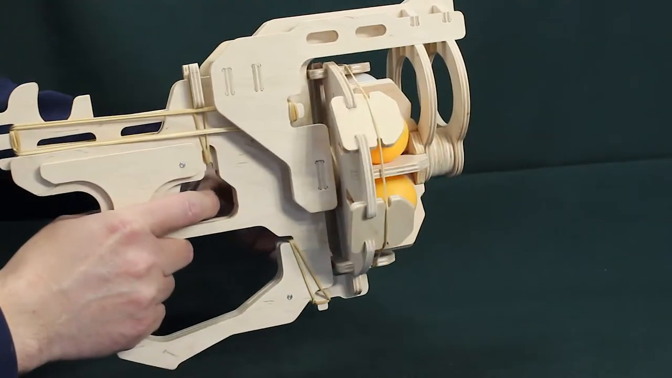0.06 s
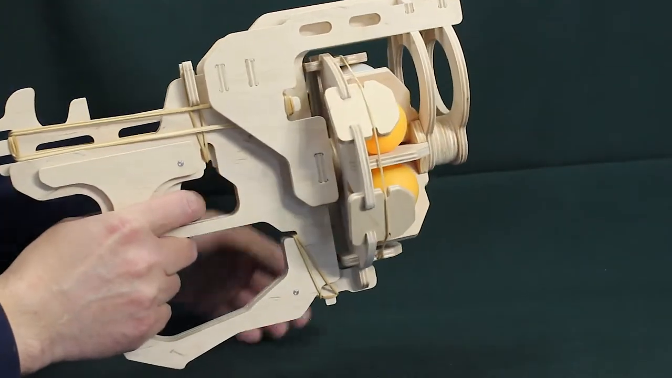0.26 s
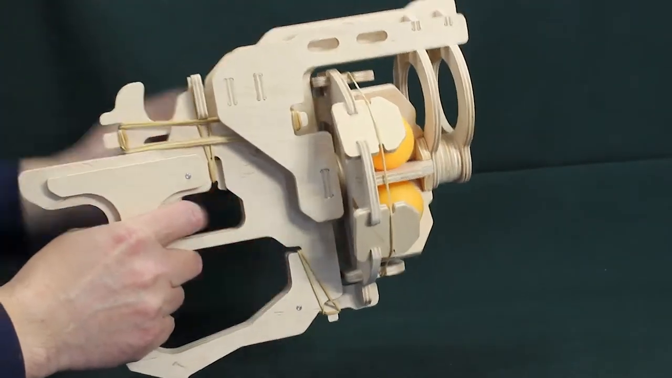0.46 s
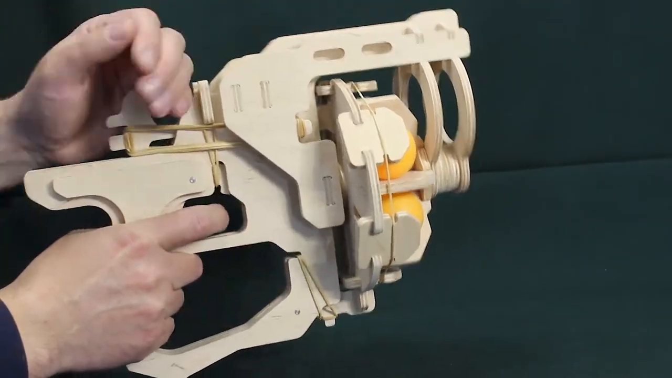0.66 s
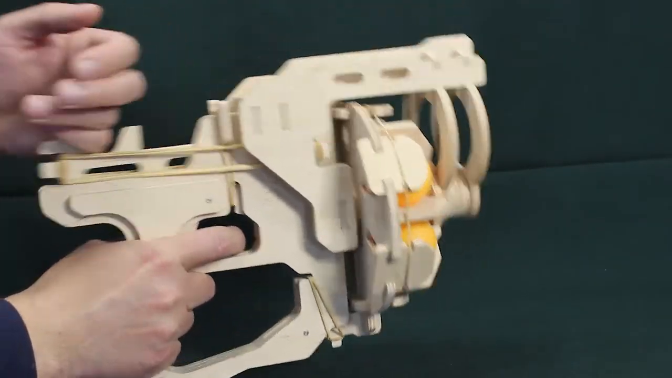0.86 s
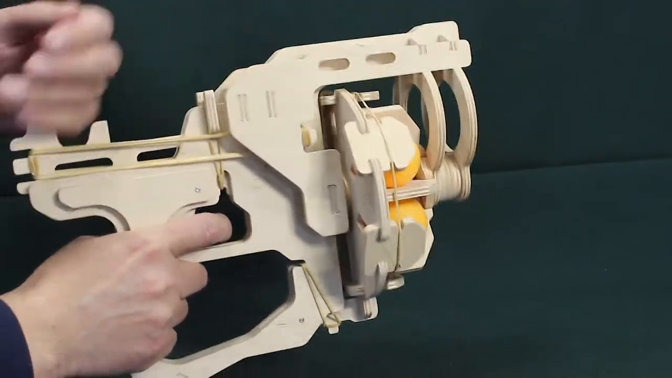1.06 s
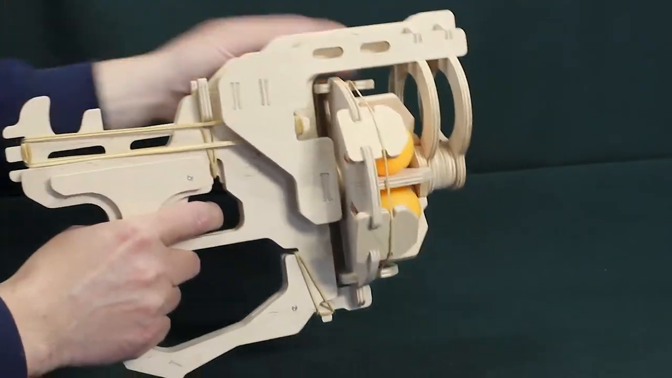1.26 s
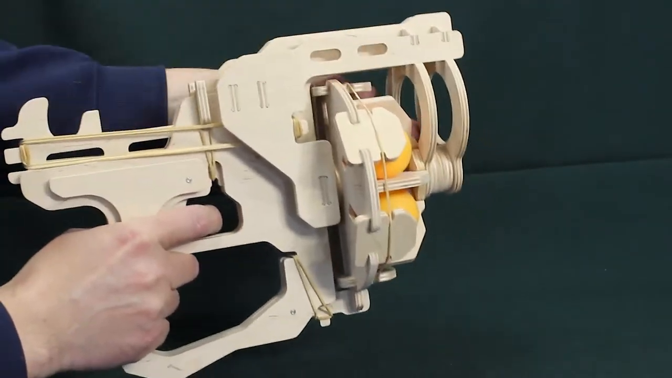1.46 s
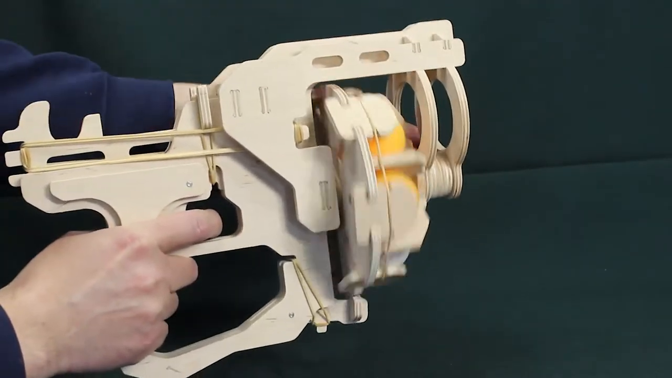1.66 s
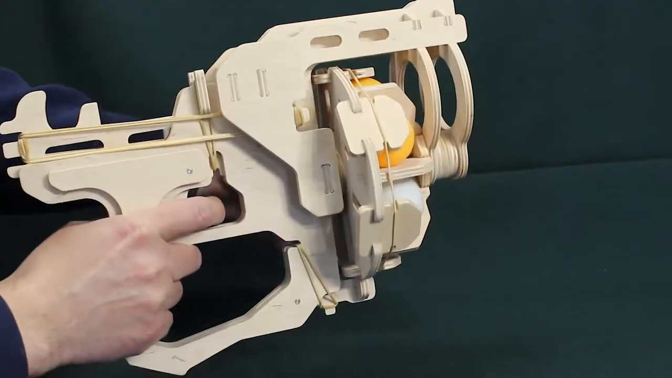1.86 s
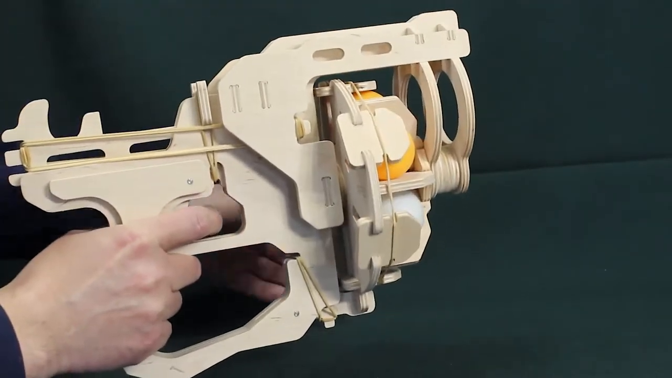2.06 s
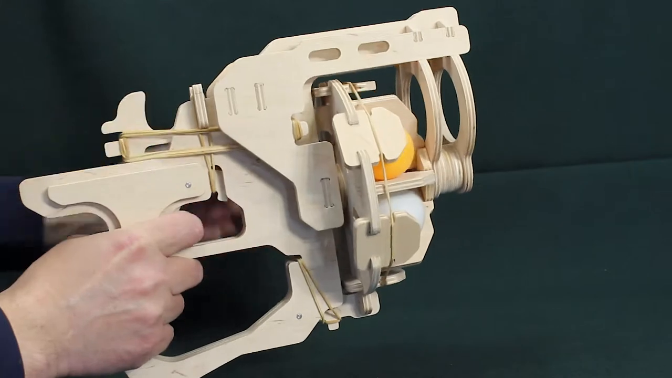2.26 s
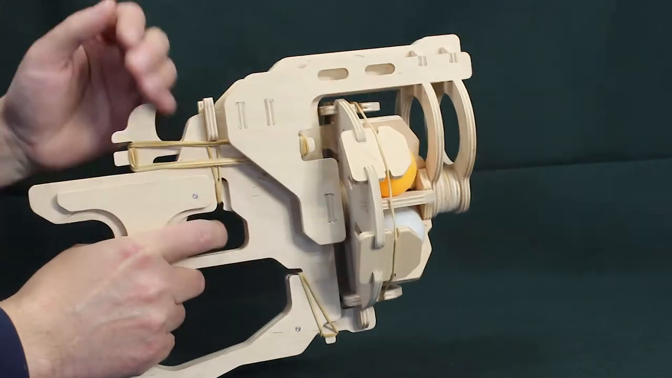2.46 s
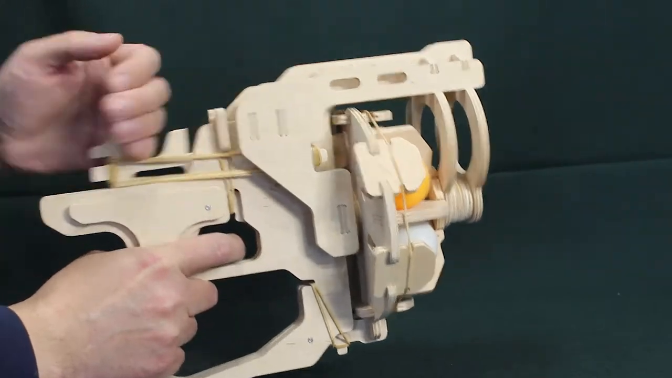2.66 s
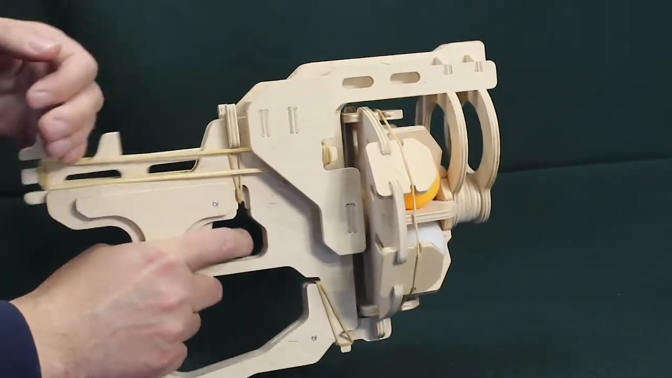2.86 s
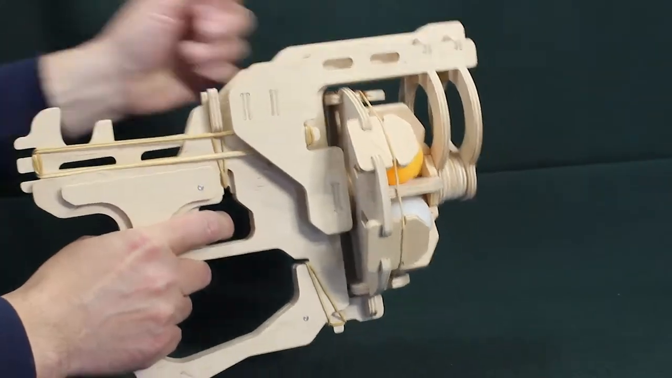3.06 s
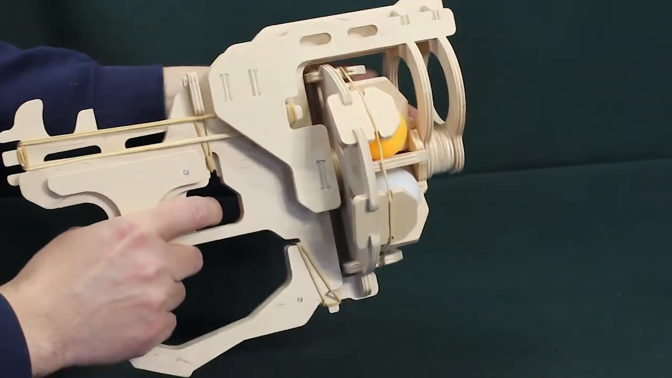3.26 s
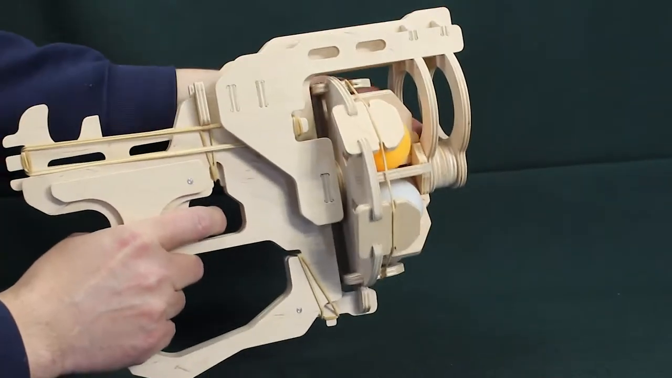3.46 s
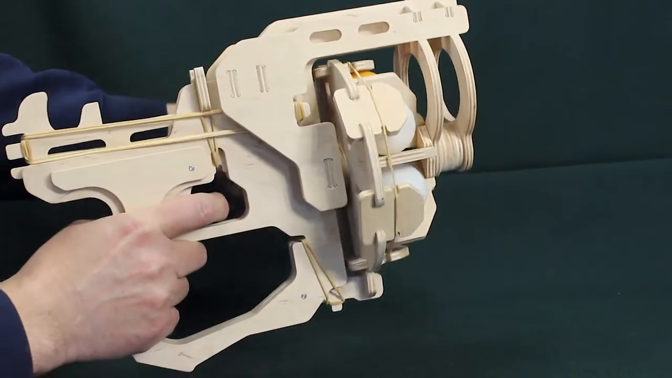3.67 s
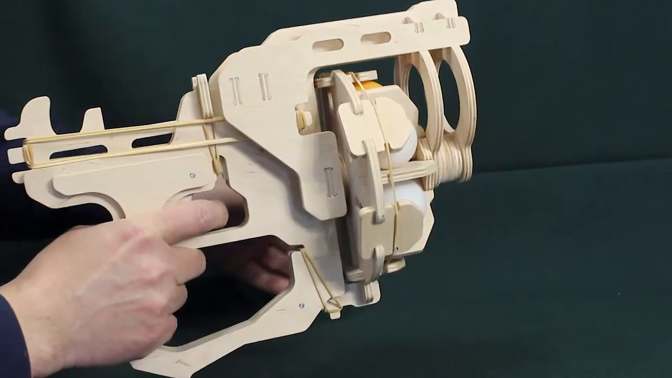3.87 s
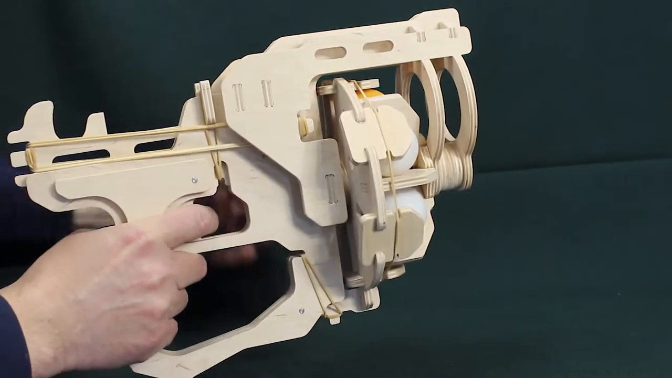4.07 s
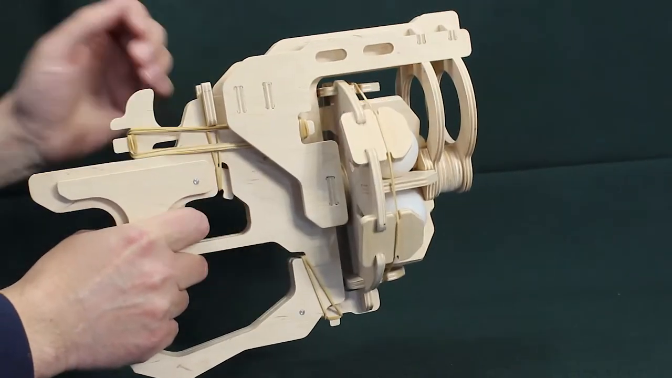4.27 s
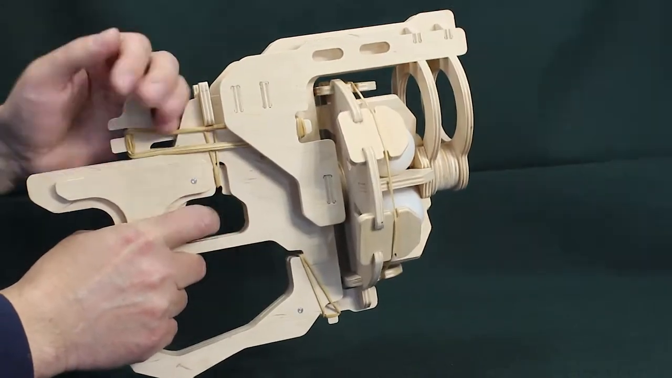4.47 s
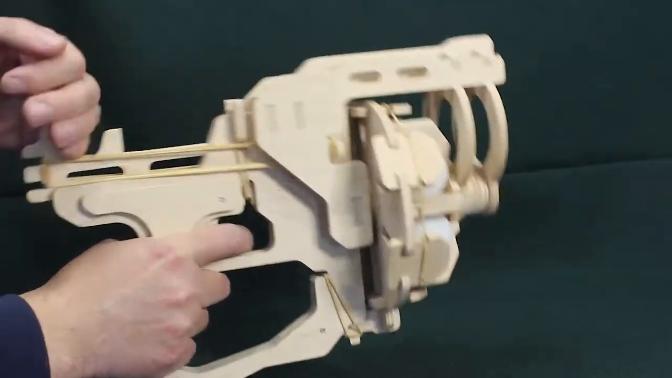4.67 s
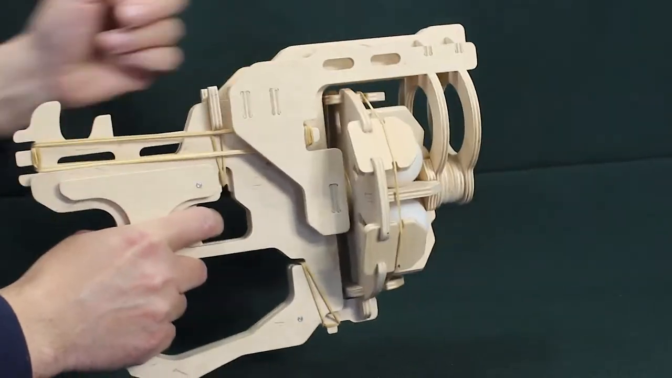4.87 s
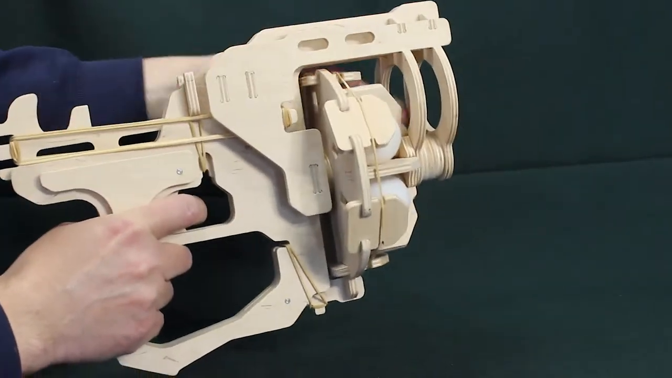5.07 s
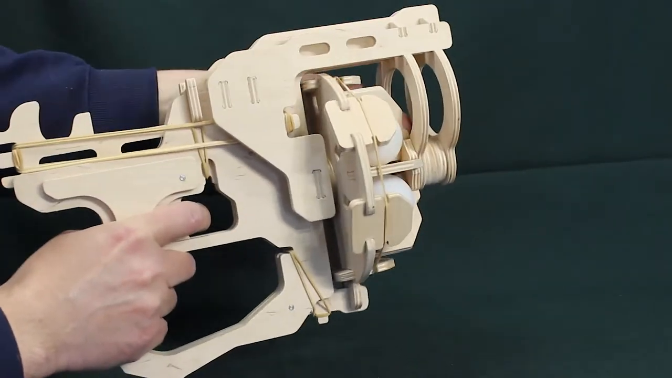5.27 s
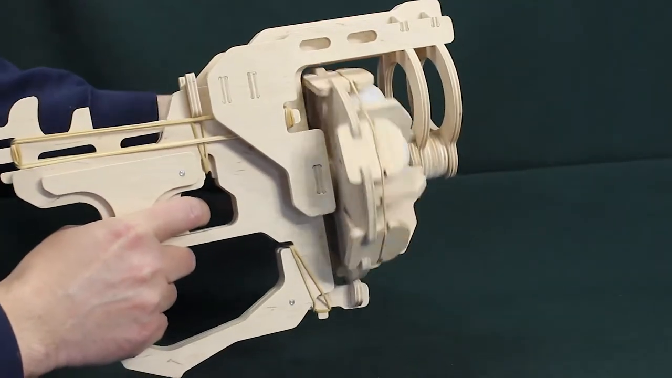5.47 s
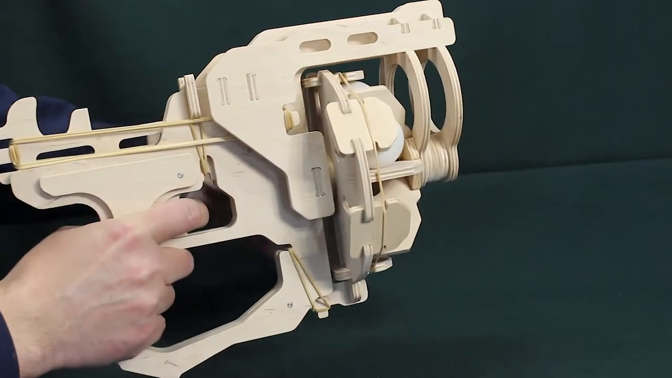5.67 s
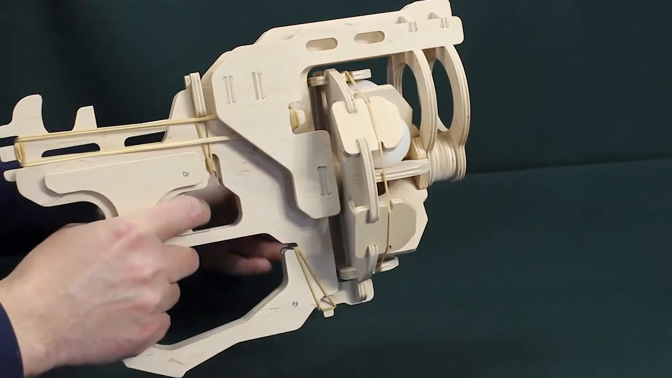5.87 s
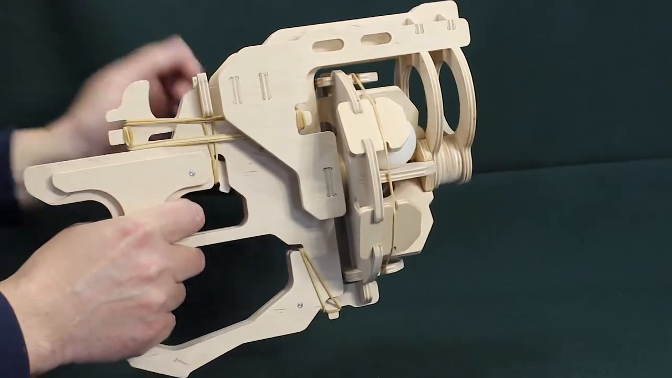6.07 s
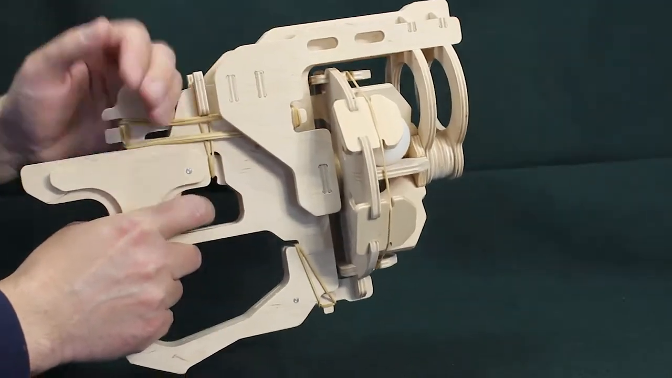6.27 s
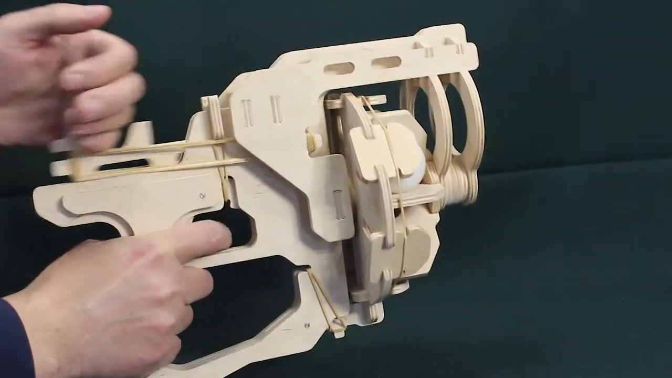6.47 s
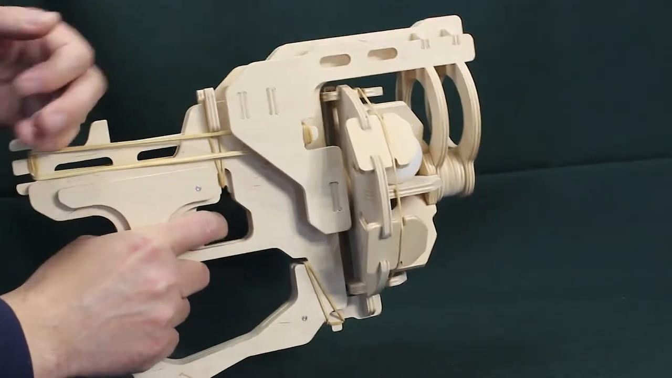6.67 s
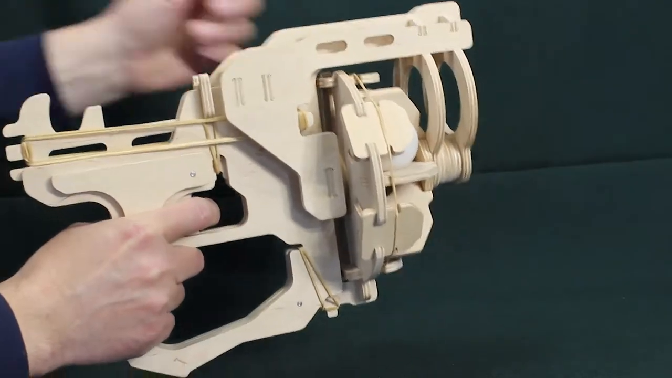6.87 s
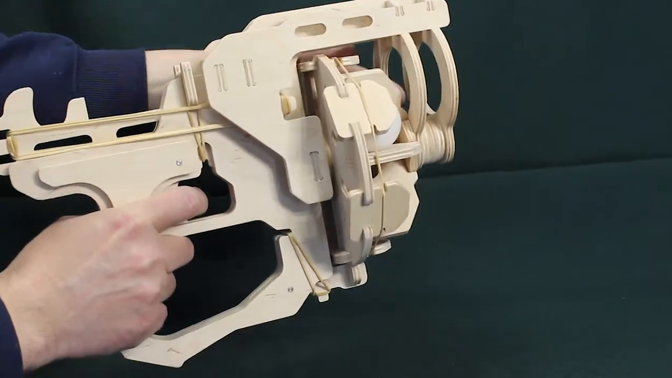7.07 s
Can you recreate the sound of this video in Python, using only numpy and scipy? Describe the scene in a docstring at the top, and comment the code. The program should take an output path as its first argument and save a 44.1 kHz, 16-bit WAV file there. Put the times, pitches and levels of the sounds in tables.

```python
"""Rubber-band gun firing table-tennis balls

A plywood gun fires four balls close to the microphone in a fairly live room. Slider slams are noise cracks
plus decaying frame modes; latch, drum and faint ticks are softer versions with one ringing part.
Balls thud into cloth (filtered pushes) and bounce on a hard floor (half-sine contacts plus shell modes).
A hollow thing is knocked, a ball squeaks, an arm stirs the air; noise impulse responses give the echo."""
import sys
import numpy as np
from scipy import signal
from scipy.fft import rfft, irfft, next_fast_len
from scipy.io import wavfile
from scipy.ndimage import uniform_filter1d

SR = 44100
rng = np.random.default_rng(int(sys.argv[2]) if len(sys.argv) > 2 else 0)


def transcribe(u):
    """Save the signal u as a 16-bit wav file named by the first command-line argument.

    u: samples, shape (n,) or (channels, n), limited to [-1, 1]; the rate is SR.
    q: integer samples, one column per channel.
    """
    v = np.clip(np.atleast_2d(u).T, -1, 1)
    q = np.round(v * 32767).astype(np.int16)
    wavfile.write(sys.argv[1], SR, q)


N = 313992

# Room tone spectrum. Each row: frequency in Hz, level in dB.
ROOM_TONE_SPECTRUM = [(20, -9), (70, -15.5), (200, -7.5), (700, -14.5), (1700, -15.5), (3000, -18.5),
                      (6000, -20.5), (16000, -22.5)]
# Spectrum of the air buffeting the microphone. Each row: frequency in Hz, level in dB.
BUFFET_SPECTRUM = [(15, 1), (35, -3.5), (60, -10), (130, -11.5), (250, -14.5), (800, -29), (4000, -81)]
# Spectrum of the sleeve's rustle. Each row: frequency in Hz, level in dB.
SLEEVE_SPECTRUM = [(100, -20.5), (400, 1.5), (1500, -0.5), (4000, -4), (7000, -14), (16000, -27.5)]
# Spectrum of the room's echo. Each row: frequency in Hz, level in dB.
ECHO_SPECTRUM = [(40, -18.5), (150, 2.5), (300, 2.5), (500, 1), (1500, 0.5), (3500, -2.5), (6000, -3),
                 (10000, -4), (16000, -5.5)]
# Decay of the room's tail. Each row: frequency in Hz, t60 in seconds.
ROOM_T60 = [(100, 0.37), (500, 0.65), (2000, 0.5), (4000, 0.46), (8000, 0.36), (16000, 0.3)]
# Squeak of a spinning ball. One row: start in seconds, length in seconds, initial pitch in Hz, peak in dB.
SQUEAK = (1.545, .125, 3770, -59)
# Knocks on something hollow, perhaps by a stray ball. Each row: start in seconds, level in dB,
# lowest mode that the blow reaches in Hz, t60 of the chatter in seconds.
HOLLOW_KNOCKS = [(1.020, -50.5, 270, 0.66), (1.185, -47, 195, 0.77), (1.522, -47, 370, 0.51),
                 (1.855, -50.5, 378, 0.25)]
# Modes of the hollow thing. Each row: frequency in Hz, level in dB, t60 in seconds.
HOLLOW_MODES = [(191.6, -0.5, 0.43), (280, 0, .65), (370, -4.5, 0.63), (460, 0, 0.4), (535, -3.5, .4),
                (657, -0.5, 0.15), (862, -3.5, 0.27), (960, 0.5, 0.32), (1090, -2.5, 0.25),
                (1195, -8, 0.15), (1486, 0.5, 0.16)]
# Soft blows, mostly balls caught by the cloth after a shot. Each row: start in seconds, pat level in dB,
# pat pitch in Hz, flap level in dB.
THUDS = [(.505, -32.5, 460, -36.5), (1.858, -41, 450, -51.5), (2.366, -38, 450, -37),
         (2.918, -48, 370, -67), (4.315, -31, 435, -37.5), (4.574, -47, 754, -54), (6.161, -34, 419, -38.5)]
# Spectrum of the cloth's flap. Each row: frequency in Hz, level in dB.
FLAP_SPECTRUM = [(50, -45), (110, -11), (155, 0), (230, -7), (350, -3.5), (800, -13), (3000, -45)]
# Floor bounces. Each row: start in seconds, knock level at 1 m in dB, distance in metres.
BOUNCES = [(0.3956, -42.5, 1.3), (0.5077, -27, .5), (0.787, -45.5, 0.83), (1.0264, -38, 2.8),
           (1.103, -40, 3.2), (1.18, -45.5, 5), (1.424, -46, 0.66), (1.5206, -34, 1.9), (1.6842, -49, 0.67),
           (2.0936, -48, 0.81), (2.4932, -49, 1.6), (3.5867, -37.5, 1.8), (4.026, -48, 0.97),
           (4.352, -41.5, 0.53), (4.9105, -29, 2), (5.389, -34.5, 1.1), (5.8073, -35.5, 1.17),
           (5.8626, -29, 0.5), (6.4943, -37, 1.45), (6.5701, -31.5, 0.42), (6.7002, -32, 1.54),
           (6.773, -33.5, 1.5), (7.0196, -40, 1.24)]
# Spectrum of the bounce's knock. Each row: frequency in Hz, level in dB.
BOUNCE_SPECTRUM = [(60, -50), (200, -24), (500, -16.5), (1200, -7.5), (2200, 3.5), (3500, 9.0), (8000, 0.0)]
# Modes of the ball's shell. Each row: mean frequency in Hz, mean level in dB.
SHELL_MODES = [(5800, -9.5), (8400, 2.5), (10900, 1.5), (13300, 1), (15300, -0.5)]
# Radiation of the small shell. Each row: frequency in Hz, level in dB.
SHELL_RADIATION = [(1000, -35), (5500, -0.5)]
# Cocking. Each row: latch catch in seconds, catch level in dB, slider settling in seconds, settling level
# in dB; levels precede the small-part filter.
COCKINGS = [(.9915, -21, 1.1318, -25), (2.8317, -21, 2.9657, -30.5), (4.7126, -19.5, 4.8265, -30),
            (6.6101, -20, 6.7357, -31)]
# Drum steps to the next ball. Each row: start in seconds, level before the small-part filter in dB,
# mean pitch of the ringing part in Hz.
DRUM_TURNS = [(1.897, -29.5, 3655), (3.7178, -28.5, 4355), (5.6215, -31.5, 1680)]
# Faint ticks: trigger, drum rocking back, rattling balls. Each row: start in seconds, level before the
# small-part filter in dB.
TICKS = [(0.1093, -43), (0.3529, -60), (2.5961, -45), (2.6856, -46.5), (2.7626, -50), (4.1928, -57)]
# Radiation of small parts, weak in the bass. Each row: frequency in Hz, level in dB.
SMALL_PART_RADIATION = [(200, -7.5), (700, -6), (1400, 0)]
# Spectrum of the frame's dense short modes. Each row: frequency in Hz, level in dB.
CRACK_SPECTRUM = [(30, -43.5), (200, -35), (500, -20), (800, -14.5), (1500, -7), (1950, 1.5), (2450, -2),
                  (2950, 0.5), (4300, 3), (5300, -4), (8200, -2), (9200, -7.5), (12000, -9), (16000, -17.5)]
# Modes of the plywood frame. Each row: mean frequency in Hz, width in Hz, mean level in dB.
FRAME_MODES = [(1288, 91, -17.5), (2033, 40, -4), (2170, 91, -5.5), (2840, 30, -5), (2920, 64, 2),
               (3630, 80, -1), (4020, 75, -4), (4504, 40, -5), (4780, 110, -5.5), (6490, 26, -8),
               (8060, 78, -5), (8326, 42, -4), (8990, 30, -6), (9850, 53, -11), (10600, 60, -17),
               (11670, 100, -7.5)]
# Slider hitting its stop. Each row: start in seconds, base level in dB, base brightness in dB per octave,
# slap on the ball in dB re the base level; each impact of the shot adds its own offsets.
SHOTS = [(0.4345, -9.5, 0.5, -13), (2.3013, -10, 0.36, -13.5), (4.2544, -8.5, 0.27, -8),
         (6.098, -8.5, 0.42, -16)]

LOWPASS_HZ = 16050
DRAUGHT_START_S, DRAUGHT_DB = 4.92, -57
DRAUGHT_RISE_S, DRAUGHT_HOLD_S, DRAUGHT_T60_S = 0.054, 0.1, 1.31
PULL_S, PULL_DB = .145, -65.5
TWIN_SPLIT_HZ, TWIN_DB = 26, -5.5
# contact length at the reference level, and the rise in level that halves it
CONTACT_MS, CONTACT_REF_DB, CONTACT_HALVING_DB = .44, -38, 20.5
SHELL_RE_KNOCK_DB, SHELL_T60_S, SHELL_SCATTER_DB = -1.5, 0.0022, 2.5
LATCH_HZ, LATCH_TILT_DB_PER_OCT = 3843, -2.06
SETTLE_HZ, SETTLE_TILT_DB_PER_OCT = 1367, -4.5
DRUM_TILT_DB_PER_OCT, ROCK_BACK_DB, ROCK_BACK_S = -5.5, -14, .0705
TICK_HZ, TICK_TILT_DB_PER_OCT = 2113, -8


def undb(db):
    """Decibels to gain."""
    return 10 ** (np.asarray(db) / 20)


def seconds(length_s):
    """Time axis in seconds."""
    return np.arange(int(length_s * SR)) / SR


def fade(t, t60_s):
    """Free exponential decay, 60 dB in t60."""
    return np.exp(-np.log(1000) * t / t60_s)


def unit(x):
    """Scale to rms 1."""
    return x / np.sqrt(np.mean(x ** 2))


def blow(x, db):
    """Give a hit the energy of one millisecond at this rms level."""
    return x * undb(db) / np.sqrt(np.sum(x ** 2) / (SR / 1000))


def read(points, hz):
    """Interpolate (Hz, value) points on a log-frequency axis."""
    point_hz, value = np.transpose(points)
    return np.interp(np.log(hz + 1), np.log(point_hz), value)


def colour(x, points, tilt_db_per_oct=0):
    """Minimum-phase filter with the given spectrum, tilted about 3500 Hz (tilt held below 800 Hz)."""
    n = 2 * next_fast_len(len(x))
    hz = np.arange(n // 2 + 1) * SR / n
    db = read(points, hz) + tilt_db_per_oct * np.log2(np.maximum(hz, 800) / 3500)
    # folding the cepstrum makes the response causal
    cepstrum = irfft(np.log(undb(db)))
    cepstrum[1:n // 2] *= 2
    cepstrum[n // 2 + 1:] = 0
    response = np.exp(rfft(cepstrum))
    return irfft(rfft(x, n) * response)[:len(x)]


def add(track, start_s, x):
    """Mix x into the track, cropped at both ends."""
    i = int(start_s * SR)
    x, i = x[max(-i, 0):], max(i, 0)
    track[i:i + len(x)] += x[:max(len(track) - i, 0)]


def ring(t, hz, t60_s):
    """One decaying mode with a random phase."""
    return np.sin(2 * np.pi * (hz * t + rng.random())) * fade(t, t60_s)


def shaped_noise(points):
    """Steady noise of rms 1 with the given spectrum."""
    hz = np.arange(N // 2 + 1) * SR / N
    return unit(irfft(rfft(rng.standard_normal(N)) * undb(read(points, hz)), N))


def background(sleeve_db=-2):
    """Faint room tone; a passing arm buffets the microphone with air and its sleeve rustles."""
    tone = shaped_noise(ROOM_TONE_SPECTRUM)
    puff = shaped_noise(BUFFET_SPECTRUM)
    rustle = shaped_noise(SLEEVE_SPECTRUM)
    age = np.arange(N) / SR - DRAUGHT_START_S
    rise = np.clip(age / DRAUGHT_RISE_S, 0, 1) ** 2
    release = fade(np.maximum(age - DRAUGHT_RISE_S - DRAUGHT_HOLD_S, 0), DRAUGHT_T60_S)
    arm = undb(DRAUGHT_DB) * rise * release
    # the rustle dies sooner than the eddies
    rustle = undb(sleeve_db) * rustle * np.sqrt(arm / arm.max())
    return undb(-75.0) * tone + arm * (puff + rustle)


def room(early_db=-5, early_t60_s=.07):
    """Impulse response: clustered early reflections and a diffuse tail with its own decay in each band."""
    t = seconds(.8)
    spectrum = rfft(rng.standard_normal(len(t)))
    hz = np.arange(len(spectrum)) * SR / len(t)
    gain = undb(read(ECHO_SPECTRUM, hz))
    band = np.round(np.sqrt(hz / 100))
    tail = np.zeros(len(t))
    for k in np.unique(band):
        inside = band == k
        tail += irfft(spectrum * gain * inside, len(t)) * fade(t, read(ROOM_T60, hz[inside].mean()))
    # heavy-tailed noise: a few reflections stand out
    early = rng.standard_normal(len(t)) * undb(3.2 * rng.exponential(size=len(t)))
    early = irfft(rfft(early) * gain, len(t)) * fade(t, early_t60_s)
    onset = np.clip((t - .002) / 0.0027, 0, 1)
    response = (unit(tail) + undb(early_db) * unit(early)) * onset
    return response / np.sqrt(np.sum(response ** 2))


def squeak():
    """A spinning ball rubs: a thin wavering tone swells, sags slightly and stops."""
    start_s, length_s, hz, peak_db = SQUEAK
    out, t = np.zeros(N), seconds(length_s)
    waver = unit(uniform_filter1d(rng.standard_normal(len(t)), size=400))
    pitch_hz = hz * (1 - 0.047 * t + 0.0057 * waver)
    tone = np.sin(2 * np.pi * np.cumsum(pitch_hz) / SR)
    add(out, start_s, undb(peak_db) * np.sin(np.pi * t / length_s) * tone)
    return out


def rails():
    """Wood slides on wood in tiny slips, harder as the bands stretch, until the latch catches."""
    out, t = np.zeros(N), seconds(PULL_S)
    for catch_s, *_ in COCKINGS:
        slips = rng.standard_normal(len(t)) * undb(2.6 * rng.exponential(size=len(t)))
        rub = unit(colour(slips, CRACK_SPECTRUM) * t)
        add(out, catch_s - PULL_S, rub * undb(PULL_DB))
    return out


def hollow(rattle_db=-1, below_db=24):
    """Chatter drives the hollow thing's modes, which swell and fade unevenly; low ones stay quiet."""
    out, t = np.zeros(N), seconds(.7)
    rings = []
    for hz, db, t60_s in HOLLOW_MODES:
        # a close, weaker twin beats with each mode
        pair = ring(t, hz, t60_s) + undb(TWIN_DB) * ring(t, hz + TWIN_SPLIT_HZ, t60_s)
        rings.append(undb(db) * pair)
    for start_s, db, lowest_hz, chatter_t60_s in HOLLOW_KNOCKS:
        reach = [(lowest_hz / 2, -below_db), (lowest_hz, 0)]
        body = sum(undb(read(reach, mode[0])) * wave for mode, wave in zip(HOLLOW_MODES, rings))
        chatter_spectrum = [(100, -33), (lowest_hz * .8, -5), (1500, -2), (2200, -10), (4000, -14), (8000, -36)]
        chatter = unit(colour(rng.standard_normal(len(t)), chatter_spectrum))
        chatter = chatter * fade(t, chatter_t60_s) * (1 - fade(t, 0.021))
        rung = unit(signal.fftconvolve(chatter, body)[:len(t)]) * np.std(chatter)
        add(out, start_s, undb(db) * (rung + undb(rattle_db) * chatter))
    return out


def thuds(crumple_db=-22, pat_t60_s=0.022):
    """A ball meets the cloth: one dull push with a little crumpling, then the cloth's low flap."""
    out, t = np.zeros(N), seconds(.15)
    for start_s, pat_db, hz, flap_db in THUDS:
        push = undb(crumple_db) * rng.standard_normal(len(t)) * fade(t, pat_t60_s)
        push[0] += 1
        pat_spectrum = [(hz / 6, -30), (hz * 0.64, -3), (hz, 0), (hz * 2, -7), (hz * 8, -30), (hz * 20, -55)]
        add(out, start_s, blow(colour(push, pat_spectrum), pat_db))
        flap = colour(rng.standard_normal(len(t)), FLAP_SPECTRUM)
        flap = flap * (1 - fade(t, 0.14)) * fade(t, .11)
        add(out, start_s + 0.006, blow(flap, flap_db))
    return out


def shell_ring(t):
    """The thin shell's modes ring briefly, reweighted by each strike; so small a ball radiates treble."""
    modes = np.zeros(len(t))
    for hz, db in SHELL_MODES:
        gain = undb(db + SHELL_SCATTER_DB * rng.standard_normal())
        modes += gain * ring(t, hz * (1 + 0.029 * rng.standard_normal()), SHELL_T60_S)
    return colour(modes, SHELL_RADIATION)


def bounces(echo_s=0.0088, echo_db=-5.5):
    """Contact pushes out a hollow knock and rings the shell; harder is shorter. Returns direct, room feed."""
    direct, room_feed, t = np.zeros(N), np.zeros(N), seconds(.02)
    for start_s, db, distance_m in BOUNCES:
        contact_ms = CONTACT_MS * 2 ** ((CONTACT_REF_DB - db) / CONTACT_HALVING_DB)
        push = np.sin(np.pi * np.minimum(t * 1000 / contact_ms, 1))
        push = push * fade(t, 0.0034)  # the ball gives back less than it takes
        knock = blow(colour(push, BOUNCE_SPECTRUM), db)
        tick = knock + blow(shell_ring(t), db + SHELL_RE_KNOCK_DB)
        add(direct, start_s, tick / distance_m)
        # a hard surface repeats it, at a level independent of distance
        add(direct, start_s + echo_s, tick * undb(echo_db))
        add(room_feed, start_s, tick)
    return direct, room_feed


def frame(db, tilt_db_per_oct, crack_t60_s, modes_db):
    """Wood on wood: a short dense crack plus the frame's modes, weighted anew by each blow."""
    t = seconds(.05)
    # random signs: full strength at once, no lone spike
    grain = np.sign(rng.standard_normal(len(t)))
    crack = colour(grain * fade(t, crack_t60_s), CRACK_SPECTRUM, tilt_db_per_oct)
    hz, width_hz, mode_db = np.transpose(FRAME_MODES)[:, :, None]
    weight, detune, phase = rng.standard_normal((3, len(FRAME_MODES), 1))
    size = width_hz * undb(mode_db + tilt_db_per_oct * np.log2(hz / 3500) + 2 * weight)
    waves = np.sin(2 * np.pi * (hz * (1 + .006 * detune) * t + phase))
    modes = size * waves * fade(t, 5.8 / width_hz)  # wider modes die sooner
    return blow(blow(crack, 0) + blow(modes.sum(axis=0), modes_db), db)


def click(db, tilt_db_per_oct, hz, part_db=-8, part_t60_s=0.017):
    """A small part snaps into place and rings briefly; the floor returns the click."""
    t = seconds(.05)
    snap = frame(db, tilt_db_per_oct, crack_t60_s=0.018, modes_db=-11.5)
    part = ring(t, hz * (1 + 0.023 * rng.standard_normal()), part_t60_s)
    snap = colour(snap + blow(part, db + part_db), SMALL_PART_RADIATION)
    out = snap.copy()
    add(out, .0085, snap * undb(-20))
    return out


def clicks(touch_s=.0053, touch_db=-17):
    """Latch catches, slider touches and settles, drum turns and rocks; faint ticks of trigger, drum and balls."""
    out = np.zeros(N)
    for catch_s, catch_db, settle_s, settle_db in COCKINGS:
        add(out, catch_s, click(catch_db, LATCH_TILT_DB_PER_OCT, LATCH_HZ, part_db=-6))
        add(out, settle_s - touch_s, click(settle_db + touch_db, SETTLE_TILT_DB_PER_OCT, SETTLE_HZ))
        add(out, settle_s, click(settle_db, SETTLE_TILT_DB_PER_OCT, SETTLE_HZ, part_db=-7.5))
    for start_s, db, hz in DRUM_TURNS:
        add(out, start_s, click(db, DRUM_TILT_DB_PER_OCT, hz, part_db=-7.5))
        add(out, start_s + ROCK_BACK_S, click(db + ROCK_BACK_DB, DRUM_TILT_DB_PER_OCT, hz))
    for start_s, db in TICKS:
        add(out, start_s, click(db, TICK_TILT_DB_PER_OCT, TICK_HZ))
    return out


def shots(recoil_db=-45.0):
    """The slider leaves the latch, slaps the ball, slams into its stop and rebounds twice."""
    out, t = np.zeros(N), seconds(.03)
    for stop_s, db, tilt, slap_db in SHOTS:
        add(out, stop_s - .0085, frame(db - 21.5, tilt - 2, crack_t60_s=.04, modes_db=-6))
        add(out, stop_s - .0023, frame(db + slap_db + 3.5, tilt + 0.5, crack_t60_s=0.029, modes_db=-4))
        add(out, stop_s, frame(db + 6.0, tilt, crack_t60_s=0.025, modes_db=-7.5))
        add(out, stop_s + .0113, frame(db - 3.0, tilt + 1.0, crack_t60_s=.02, modes_db=-8.5))
        add(out, stop_s + .0185, frame(db - 8, tilt - 3.5, crack_t60_s=0.032, modes_db=-4))
        # the whole gun jolts and pushes the air once
        jolt = fade(t, 0.0052) - fade(t, 0.019) / 4
        add(out, stop_s - .001, blow(jolt, recoil_db))
    return out


def echoes(soft, balls, count=3):
    """The gun radiates differently in each direction: each path has fresh gun hits and its own response; the
    balls and soft sounds feed every path alike."""
    out = np.zeros(N)
    for _ in range(count):
        response = room()
        sent = undb(-8.0) * shots() + undb(-8.5) * clicks() + undb(1.0) * balls + undb(-7) * soft
        out += signal.fftconvolve(sent, response)[:N]
        # the echo of an earlier click is still dying away at the start
        earlier = frame(-31.5, -3.0, crack_t60_s=0.025, modes_db=-10.5)
        add(out, -.04, signal.fftconvolve(earlier, response))
    return out / np.sqrt(count)


def scene():
    """The near gun and the balls share one room."""
    soft = thuds() + rails()
    balls_direct, balls_in_room = bounces()
    gun = shots() + clicks()
    others = balls_direct + soft + hollow() + squeak()
    return (gun + others + echoes(soft, balls_in_room) + background())[None]


def record(dry):
    """Clip at full scale, then cut the top with a steep low-pass."""
    lowpass = signal.ellip(8, .2, 70, LOWPASS_HZ, fs=SR, output="sos")
    return signal.sosfilt(lowpass, np.clip(dry, -1, 1))


dry = scene()
out = record(dry)
transcribe(out)
```